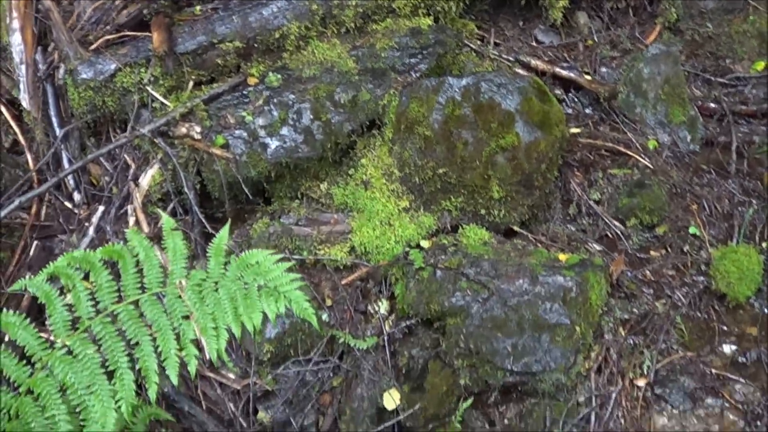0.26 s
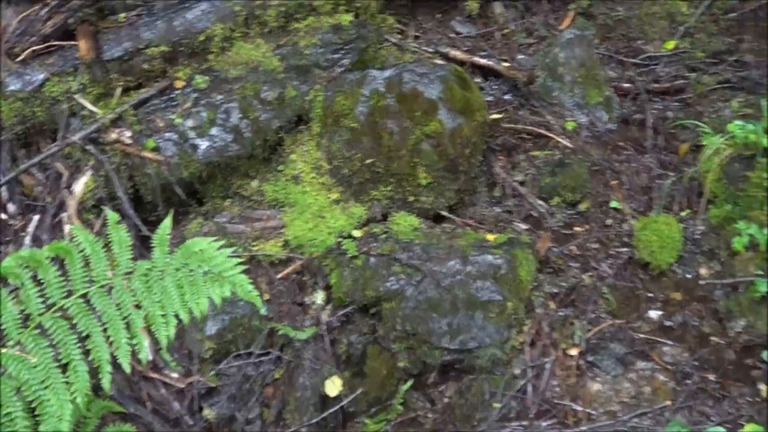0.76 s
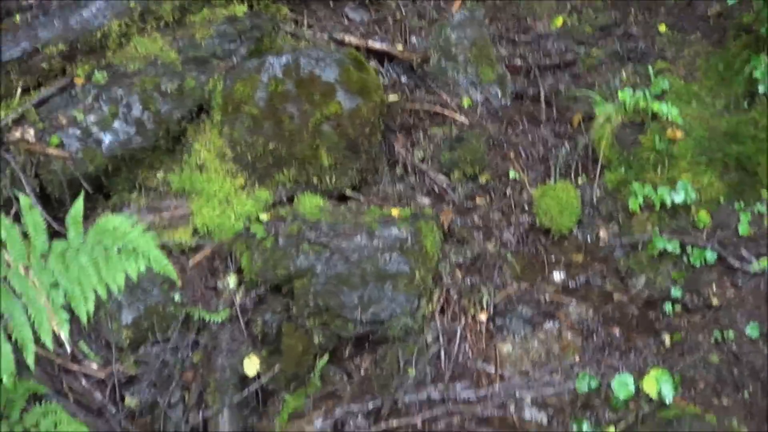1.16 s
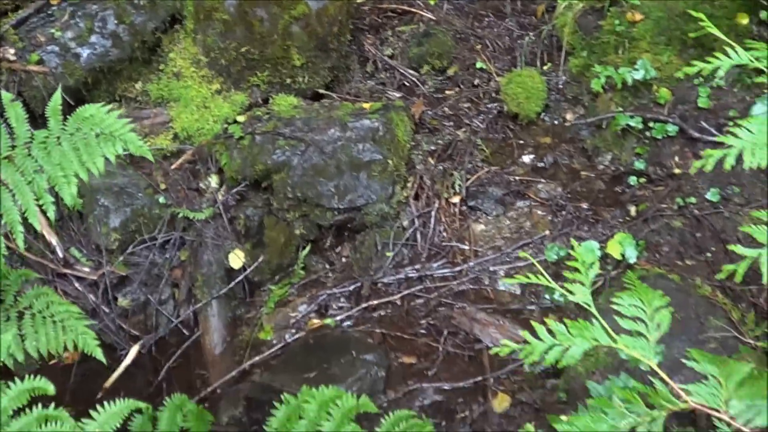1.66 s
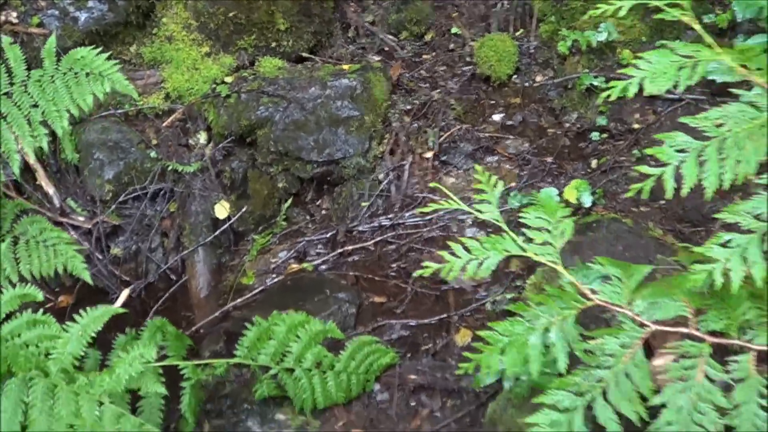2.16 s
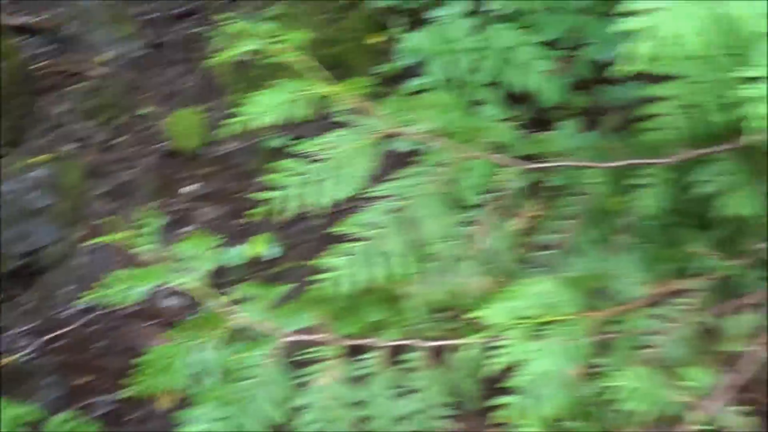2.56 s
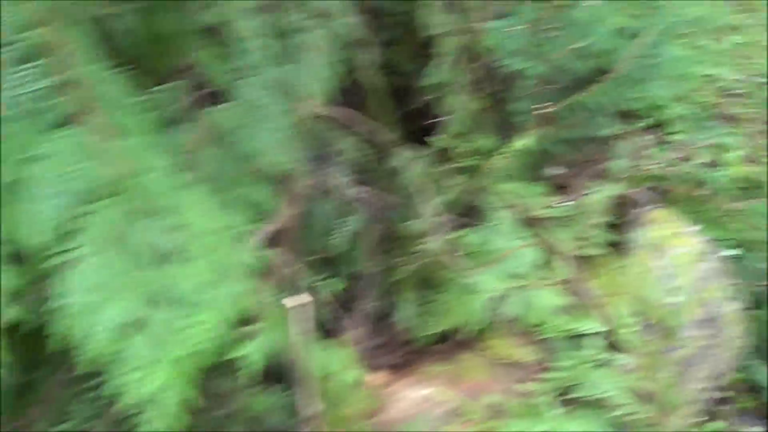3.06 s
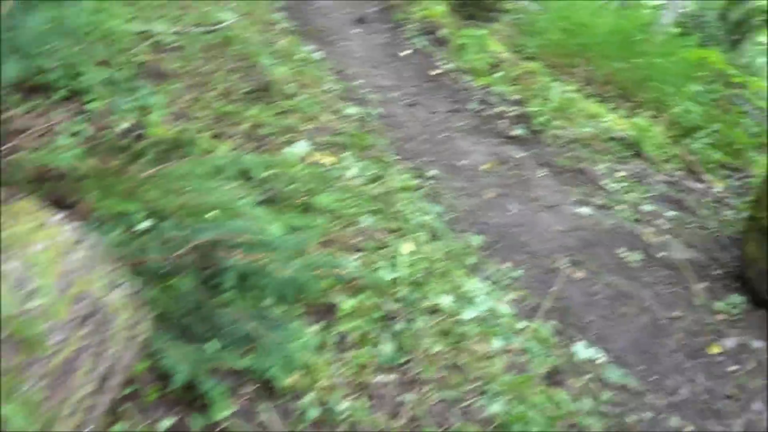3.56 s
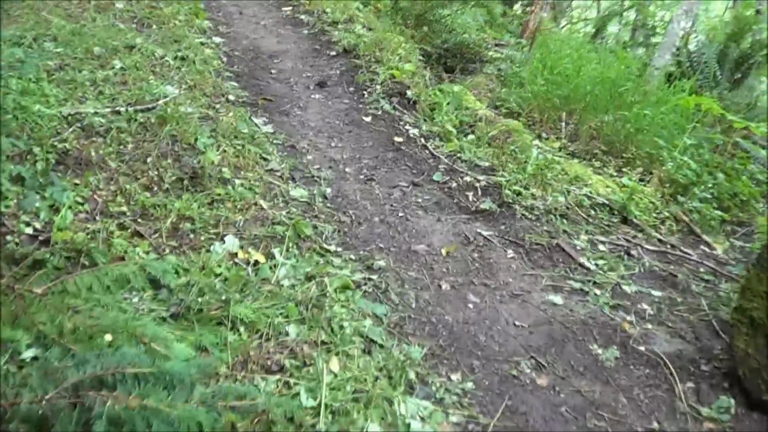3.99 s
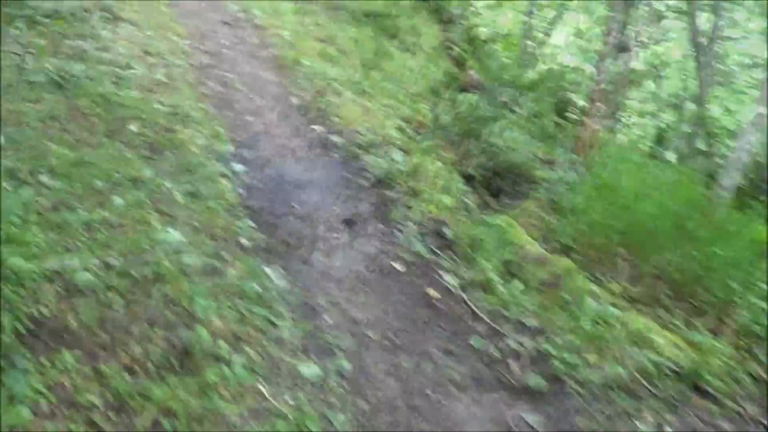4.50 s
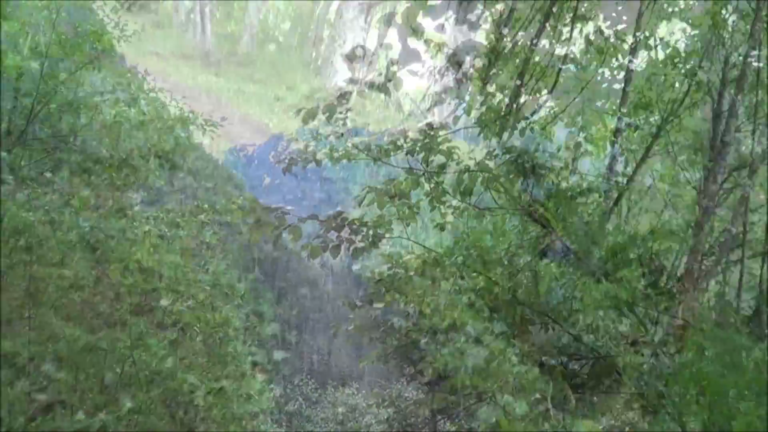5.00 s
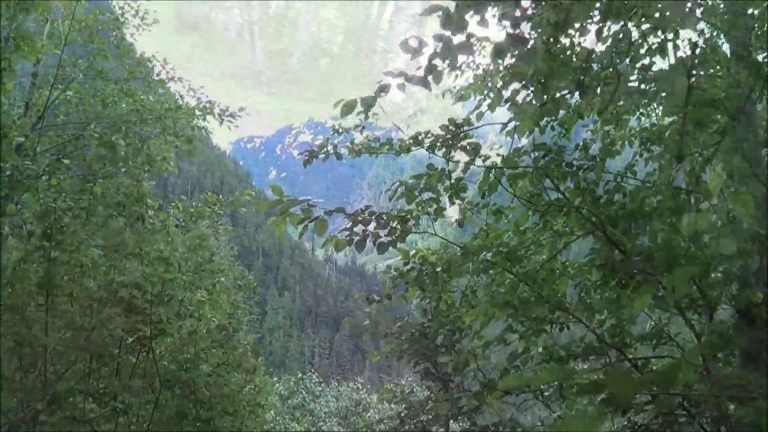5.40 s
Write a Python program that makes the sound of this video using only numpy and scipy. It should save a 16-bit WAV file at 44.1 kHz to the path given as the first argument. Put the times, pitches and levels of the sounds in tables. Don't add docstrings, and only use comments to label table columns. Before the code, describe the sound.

Outdoors in a forest, thin streams and drops from a rock overhang patter on wet stone, close to a handheld stereo microphone. Bright hiss, sharp splats and small ringing plops run steadily, shift left as the camera turns, then dull. Short hollow knocks from a hand on the camera body click around four seconds. The near water dies away at five seconds, leaving a soft distant creek that gently swells.

```python
import sys
import numpy as np
from scipy import signal
from scipy.fft import rfft, irfft
from scipy.io import wavfile
from scipy.ndimage import uniform_filter1d

SR = 44100
rng = np.random.default_rng(int(sys.argv[2]) if len(sys.argv) > 2 else 0)


def file_out(sig):
    cols = np.atleast_2d(sig).T
    lim = np.clip(cols, -1, 1)
    pcm = np.round(lim * 32767).astype(np.int16)
    wavfile.write(sys.argv[1], SR, pcm)


def makeup_ratio(level_db):
    decades = np.asarray(level_db, float) / 20
    return 10 ** decades


N = 248720
TIME = np.arange(N) / SR
VALLEY_S = 4.91


def evened(x):
    return x / np.sqrt(np.mean(x ** 2) + 1e-20)


def read(points, hz):
    f, value = np.transpose(points)
    return np.interp(np.log(hz + 1), np.log(f + 1), value)


def add(mix, start_s, sound):
    part = mix[..., round(start_s * SR):][..., :sound.shape[-1]]
    part += sound[..., :part.shape[-1]]


def band(x, hz, width_hz):
    b, a = signal.iirpeak(min(hz, SR / 2.2), max(hz / width_hz, .3), SR)
    return signal.lfilter(b, a, x)


def coloured(x, points):
    gain = makeup_ratio(read(points, np.fft.rfftfreq(N, 1 / SR)))
    return evened(irfft(rfft(x) * gain, N))


def wash(patch_db, gust_db):
    frames = N // 128 + 5
    a, b, patches = rng.standard_normal((frames, 257, 3)).T
    patches = uniform_filter1d(patches, size=8, axis=0)
    patches = evened(uniform_filter1d(patches, size=12, axis=1))
    surges = evened(uniform_filter1d(rng.standard_normal(frames), size=16))
    z = (a + 1j * b) * makeup_ratio(patch_db * patches + gust_db * surges)
    return evened(signal.istft(z, nperseg=512, noverlap=384)[1][:N])


def patter(per_s, spread_db, lo_hz, hi_hz, cycles, tail_s):
    excess = np.minimum(rng.exponential(1, N), 3)
    size = makeup_ratio(spread_db * excess) * (rng.random(N) < per_s / SR)
    kind = rng.integers(0, 24, N)
    t, out = np.arange(1500) / SR, np.zeros(N)
    for k, hz in enumerate(np.geomspace(lo_hz, hi_hz, num=24)):
        drive = 0.57 * rng.standard_normal(len(t)) * np.exp(-t / tail_s)
        drive[0] = 2
        grain = band(drive, hz, hz / cycles)
        grain = grain / np.linalg.norm(grain) * np.sqrt(hz)
        out += signal.oaconvolve(size * (kind == k), grain)[:N]
    return evened(out)


def burst(peak_db, t60, x):
    t = np.arange(len(x)) / SR
    attack = np.minimum(t / .0004, 1)
    x = x * makeup_ratio(-60 * t / max(t60, .004)) * attack
    return makeup_ratio(peak_db) * x / abs(x).max()


def water_path():
    # start_s, nearness_db, treble_loss_db
    path = [(0, -34.5, -2), (.28, -34.5, -0.5), (.9, -33.5, 0), (1.22, -33, .5), (1.32, -32, -0.5),
            (1.52, -33, 0), (2.24, -31, 1.5), (2.39, -29, 3), (2.7, -31, 1.5), (3.25, -29, 6),
            (3.575, -30.5, 7.5), (3.63, -27, 3.5), (3.8, -31.5, 7), (3.93, -31.5, 7), (4.05, -36, 6),
            (4.73, -38, 7.5), (4.87, -40.5, 7), (5.05, -46, 6.5)]
    s, nearness_db, treble_loss_db = np.transpose(path)
    return np.interp(TIME, s, nearness_db), np.interp(TIME, s, treble_loss_db)


def fading():
    return 11 * np.maximum(TIME - VALLEY_S, 0)


def spray():
    # pitch_hz, level_db (per Hz)
    colour = [(2000, -33), (3200, -8.5), (4700, -8), (5500, -3.5), (6800, -3.5), (8500, -1.5), (10200, 1),
              (12500, -5), (14500, -10), (16200, -11)]
    hiss = wash(patch_db=1.2, gust_db=.5)
    droplets = patter(600, spread_db=5., lo_hz=4000, hi_hz=14500, cycles=1.5, tail_s=.003)
    nearness_db, treble_loss_db = water_path()
    level_db = 10.5 + nearness_db - treble_loss_db - fading()
    return makeup_ratio(level_db) * coloured(hiss + .5 * droplets, colour)


def splats():
    # start_s, peak_db, t60_s
    slab_drops = [(.0226, 0, .1), (.065, -3, 0.036), (0.0987, -5, 0.059), (.2853, -11, .07),
                  (.3845, -12, .07), (.4496, -5, 0.12), (0.484, -5, 0.14), (.51, -3.5, .092),
                  (.624, -8, .09), (0.6626, -2, .056), (.7566, -6, .07), (0.7883, -4.5, 0.19),
                  (1.1107, -5.5, .07), (1.274, -4.5, 0.12), (1.3114, 2.5, .07), (1.5118, 1, .08),
                  (1.5667, -9, .07), (1.5855, -4.5, .07), (1.8248, -7, 0.076), (1.86, 0, 0.1),
                  (1.8964, 0, 0.24), (2.182, -1.5, .07), (2.297, 1.5, .15), (2.4932, -11, 0.078),
                  (4.24, -13, .07), (3.162, -5, .11), (3.1882, -6, .08), (3.216, -7, .085),
                  (3.316, -4, 0.17), (3.6277, -5, 0.12)]
    # start_s, peak_db, centre_hz
    moss_slaps = [(0.5318, -4.5, 7000), (.728, -2.5, 5500), (0.8826, -5.5, 8300), (1.044, -10, 8310),
                  (1.13, -4, 7060), (1.725, -6, 6000), (1.746, -5, 7200), (2.054, -5, 8500),
                  (1.8395, -2, 6100), (1.886, -3, 7220), (1.957, -8, 6830), (2.0383, -6, 9540),
                  (2.236, -9, 10200), (2.271, -6, 8420), (2.3445, -1.5, 7750), (2.4092, -3.5, 5220),
                  (2.434, -2, 8060), (2.543, -1.5, 7400), (2.6782, -3, 5400), (3.059, -2, 6900),
                  (3.37, -4, 6320), (3.7055, -13, 10200), (3.787, -10.5, 10500), (3.871, -11, 10000),
                  (.2563, -12, 9720), (.5661, -12, 9760), (1.412, -12, 9370), (1.6382, -12, 9900),
                  (2.8548, -.5, 8300), (2.986, 1.5, 8300)]
    # start_s, peak_db, centre_hz
    grit_ticks = [(.0034, 1, 8600), (.0649, -2, 12500), (.2114, -5, 7200), (3.993, -8, 10900),
                  (4.0095, -13, 4000), (4.0235, 2, 4000), (4.1994, -14, 5600), (4.3091, -10, 11100),
                  (4.4628, -5.5, 10550), (4.5095, -15, 11200), (4.5462, -11, 9420), (4.7024, -13, 10600),
                  (4.732, -11, 9910), (4.7664, -17, 10200), (4.8015, -6.5, 4300), (4.8104, -15, 9650),
                  (4.8409, -19, 10200), (4.8908, -8.5, 12500), (4.9933, -6, 7600), (5.0325, -12, 9500),
                  (5.1685, -19, 4980), (5.082, -23, 9500), (5.37, -17.5, 4380), (5.42, -22, 9980),
                  (5.5315, -21, 9740), (5.565, -25, 9000), (5.592, -24, 11500), (5.6266, -24, 10500)]
    wet_crack, dry_crack = 0.3, 0.56
    rows = [(s, db, 9600, t60, wet_crack) for s, db, t60 in slab_drops]
    rows += [(*row, 0.092, wet_crack) for row in moss_slaps]
    rows += [(*row, 0.033, dry_crack) for row in grit_ticks]
    out, t = np.zeros(N), np.arange(4000) / SR
    for (s, db, hz, t60, crack), noise in zip(rows, rng.standard_normal((len(rows), 4000))):
        impact = noise * np.exp(-((t - .0006) / .0004) ** 2)
        snap = band(impact, hz + 500, crack * 22700)
        mist = evened(band(band(noise, hz, 5300), hz, 5300))
        add(out, s, burst(db - 3.0, t60, mist + 8 * np.clip(crack, 0, 1) * snap))
    return out


def plops():
    # start_s, peak_db, bubble_hz, splatter_share (0-1)
    puddle_drops = [(.1004, -13, 2600, 0.7), (.1473, -13.5, 2100, .2), (.4304, -15, 2230, .6),
                    (.4494, -9.5, 3100, .9), (.7187, -16, 2840, 0.4), (.9655, -11, 2290, 0.06),
                    (1.111, -7.5, 2780, 0.8), (1.3064, -12, 2600, 0.3), (1.4446, -8.5, 2560, 0.55),
                    (1.586, -16, 2300, .45), (1.959, -8.5, 2540, 0.8), (2.1143, -10.5, 2110, 0.9),
                    (2.284, -6.5, 2400, 1), (2.4347, 1, 2020, 0.6), (2.4645, -7, 2750, 0.6),
                    (2.5323, -5.5, 2160, 0.8), (2.5428, -8, 2210, .6), (2.6768, -9.5, 2670, 0.55),
                    (2.739, -16, 2960, .2), (3.1603, -10, 2120, 0.6), (3.2192, -18, 2100, .4),
                    (3.5287, -7, 2650, 0.5), (3.8906, -20, 2430, 0), (3.9807, -11, 2090, .5),
                    (4.0233, -12.5, 2460, 0.15), (4.416, -19.5, 2340, .9), (4.5715, -17, 2840, 0.53),
                    (4.7311, -18.5, 2010, 0.5), (4.8014, -16, 3130, .8), (5.1377, -23, 1950, 0)]
    # start_s, peak_db, bubble_hz
    film_drips = [(.4853, -8.5, 3150), (.55, -16, 4140), (.567, -14.5, 3910), (1.0003, -11, 3600),
                  (1.275, -12, 3380), (1.481, -10.5, 3750), (1.6526, -19, 3960), (1.7248, -16, 4800),
                  (1.8627, -18, 3970), (1.8956, -12.5, 3320), (2.1806, -8, 4840), (2.2667, -14, 4250),
                  (2.3421, -20, 4080), (2.4076, -11.5, 3940), (2.423, -6, 3900), (2.9198, -15, 3610),
                  (2.965, -6, 3400), (3.0583, -10, 3600), (3.1867, -15.5, 3830), (3.3134, -9.5, 3720),
                  (3.3631, -7, 3900), (3.428, -17, 3950), (3.6042, -15, 4230), (3.7593, -9.5, 4080),
                  (3.805, -8.5, 3780), (3.943, -13, 3940), (4.0094, -15, 3980), (4.4687, -14, 4200),
                  (4.7206, -23, 3760), (5.3692, -31, 4400)]
    rows = [(*row, 0.055) for row in puddle_drops]
    rows += [(s, db, hz, .5, .125 + 0.03 * db) for s, db, hz in film_drips]
    out, t = np.zeros(N), np.arange(4000) / SR
    for (s, db, hz, share, t60), noise in zip(rows, rng.standard_normal((len(rows), 4000))):
        if s > 3.2:
            t60 = 0.034
        tone = np.sqrt(2) * np.sin(2 * np.pi * hz * (t + 1.5 * t ** 2))
        bubble = tone + .6 * evened(band(noise, hz, 250))
        splatter = evened(band(band(noise, hz, 2400), hz, 2400))
        share = np.clip(share + max(hz / 3000 - 1, 0), 0, 1)
        add(out, s, burst(db - 3.5, t60, (1 - share) * bubble + share * splatter))
    return out


def trickle():
    # pitch_hz, level_db (per Hz)
    colour = [(700, -22), (1300, -4), (2100, 1), (2600, 0.5), (3200, -4), (4000, -1), (4800, -7),
              (6000, -10), (9000, -28)]
    flow = wash(patch_db=0.94, gust_db=-1.0)
    bubbles = patter(200, spread_db=3.5, lo_hz=1185, hi_hz=5050, cycles=7.1, tail_s=0.01)
    nearness_db, _ = water_path()
    level_db = nearness_db - 0.5 - 0.22 * fading()
    return makeup_ratio(level_db) * coloured(flow + 0.48 * bubbles, colour)


def knocks():
    # start_s, peak_db, pitch_hz, t60_s, left_right_db
    taps = [(2.434, -18, 1490, 0.045, 7), (2.531, -36, 1350, 0.051, 4.0), (3.216, -24.5, 404, 0.073, -8),
            (3.595, -25, 330, 0.068, -10), (3.619, -23.5, 312, 0.036, -9), (3.9814, -6.5, 948, 0.032, 0.5),
            (4.023, -17, 976, 0.023, 1), (4.39, -33, 304, 0.071, -9), (4.539, -16, 940, 0.029, 1.0),
            (4.728, -29, 1160, 0.049, 3), (4.8, -29.5, 1364, 0.082, 9), (4.951, -29.5, 774, 0.023, 0),
            (4.99, -37, 1180, 0.047, 8), (5.369, -38, 695, 0.055, 2)]
    modes = ((1, 4.5), (1.25, -2.5), (0.833, -4.5), (0.474, -3.5), (1.7, -8.5))  # (pitch ratio, dB)
    out, t = np.zeros((2, N)), np.arange(6000) / SR
    for s, db, hz, t60, pan_db in taps:
        ring = sum(makeup_ratio(mode_db) * np.sin(2 * np.pi * hz * ratio * t) for ratio, mode_db in modes)
        ring *= makeup_ratio(-60 * t / max(t60, .01)) * np.minimum(t / .0012, 1)
        b, a = signal.butter(2, 0.72 * hz, "high", fs=SR)
        ring = signal.lfilter(b, a, ring)
        side = 0.63 * np.roll(ring, 12)
        pair = np.array([makeup_ratio(pan_db / 2) * ring + side, makeup_ratio(-pan_db / 2) * ring - side])
        add(out, s, makeup_ratio(db) / abs(ring).max() * pair)
    return out


def creek():
    # pitch_hz, level_db (per Hz)
    colour = [(15, -67), (25, -34), (284, -6), (319, -6), (471, -3.5), (634, -2), (779, -2), (854, -1.5),
              (1150, -3.5), (2140, -11.5), (2690, -20.5), (3230, -14), (6000, -25), (7800, -49),
              (13200, -120)]
    since_s = TIME - VALLEY_S
    valley = np.clip(since_s * 10, 0, 1) * makeup_ratio(-51 + 14.5 * since_s)
    nearness_db, _ = water_path()
    near = makeup_ratio(-13 + 0.76 * nearness_db)
    return np.hypot(near, valley) * coloured(wash(patch_db=1.4, gust_db=-0.3), colour)


def swinging(t):
    # start_s, end_s, scatter_db
    swings = [
        (.9, 1.26, 5),
        (2.5, 2.85, 1.5),
        (3.5, 3.72, 4.5),
        (3.93, 4.24, 4.5),
        (4.48, 5.8, 5.5),
    ]
    still_db, rise_s = -4, .08
    raised = []
    for start_s, end_s, db in swings:
        inside = np.clip(np.minimum(t - start_s, end_s - t) / rise_s + .5, 0, 1)
        raised.append(inside * (db - still_db))
    return still_db + np.max(raised, axis=0)


def ports(x):
    # pitch_hz, likeness (0-1)
    likeness = [(60, .995), (150, .985), (400, .95), (900, .9), (2400, .84), (4500, .8), (6000, .91),
                (9000, .95), (15000, .97)]
    # pitch_hz, left_right_db
    left_lean = [(300, .8), (700, 2), (1400, 3.5), (2500, 7), (4600, 7.5), (6200, 1.6), (12000, .4)]
    # pitch_hz, lead_radians
    left_lead = [(150, .1), (700, .7), (1100, .75), (1750, .25), (2400, .75), (4400, .85), (5200, .05)]
    # start_s, turn_db
    water_turn = [
        (0, 1),
        (.9, 3.5),
        (1.2, 4.5),
        (1.7, 3),
        (2.3, 4.5),
        (2.75, 6.5),
        (3.2, 5),
        (4.1, 5),
        (4.8, 4.5),
        (5.64, 3),
    ]
    full_turn_db = 6
    hz, t, direct = signal.stft(x, SR, nperseg=512)
    echo = 1.9 * direct * np.exp(2j * np.pi * rng.random(direct.shape[::-1]).T)
    echo *= makeup_ratio(np.outer(np.clip(hz / 1500 - 3, 0, 1), swinging(t)))
    same = np.clip(read(likeness, hz), 0, 1)[:, None]
    turn_db = np.interp(t, *np.transpose(water_turn))
    lean = makeup_ratio(np.outer(read(left_lean, hz), turn_db) / full_turn_db / 2)
    lean = lean * np.exp(.5j * read(left_lead, hz))[:, None]
    direct = direct * np.sqrt((1 + same) / 2)
    echo = echo * np.sqrt((1 - same) / 2)
    pair = np.array([(direct + echo) * lean, (direct - echo) / lean])
    return signal.istft(pair, SR, nperseg=512)[1][:, :N]


def scene():
    water = spray() + splats() + plops() + trickle() + creek()
    return ports(water) + knocks()


def low_pass(x):
    return signal.sosfilt(signal.butter(12, 16870, fs=SR, output="sos"), x)


def record(dry):
    b, a = signal.butter(2, 55, "high", fs=SR)
    x = signal.lfilter(b, a, dry)
    x = 1.1 * np.tanh(x / 1.1)
    edge = signal.firwin(401, 15800, window=("kaiser", 5), fs=SR)
    return low_pass(signal.oaconvolve(x, edge[None], "same"))


dry = scene()
out = record(dry)
file_out(out)
```